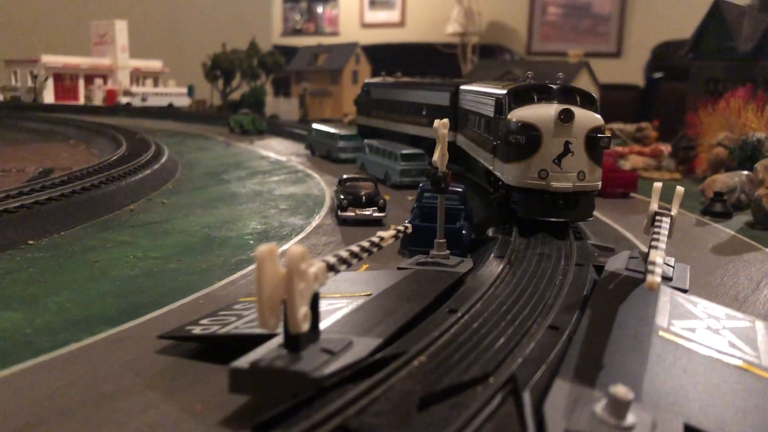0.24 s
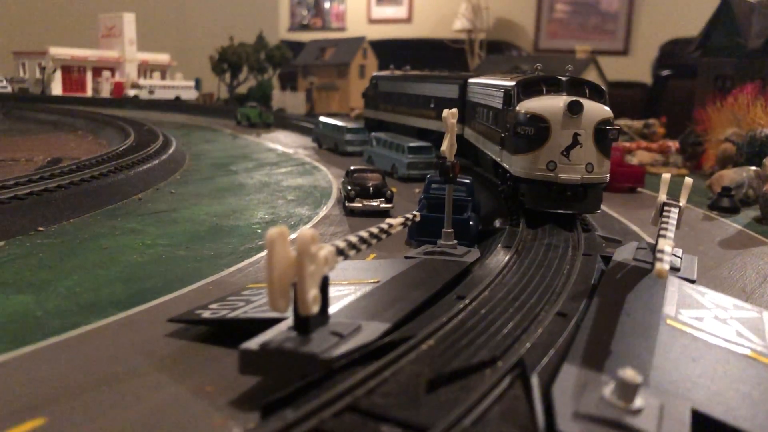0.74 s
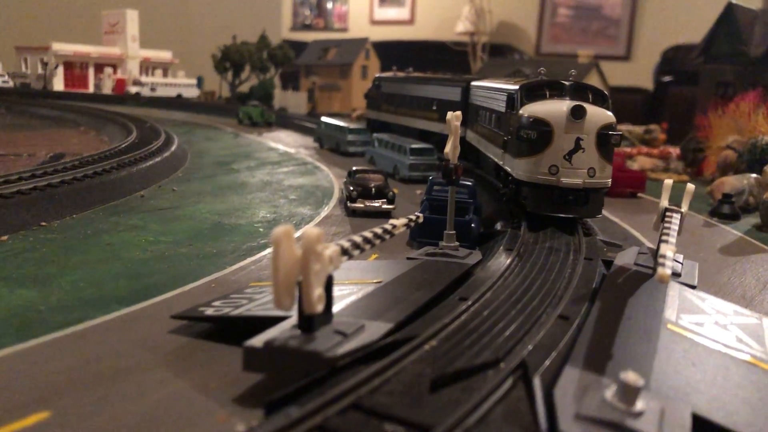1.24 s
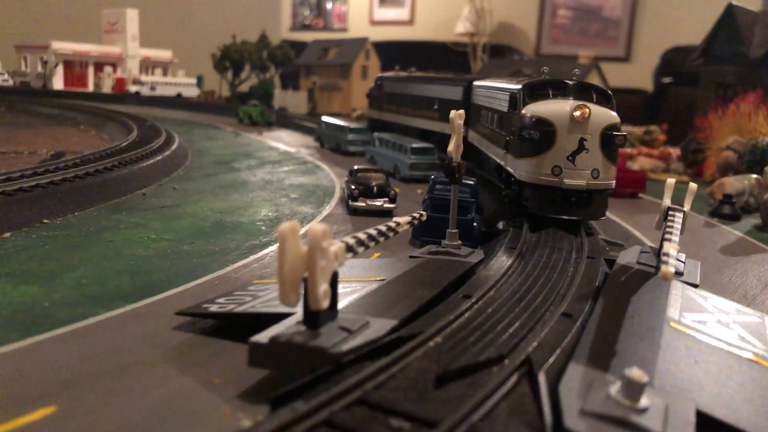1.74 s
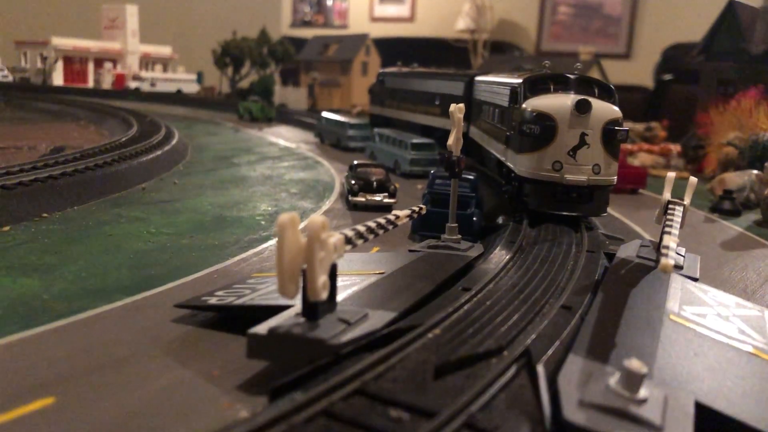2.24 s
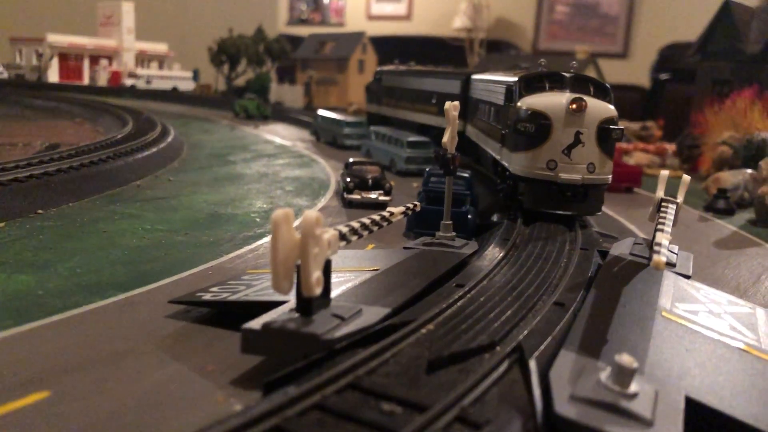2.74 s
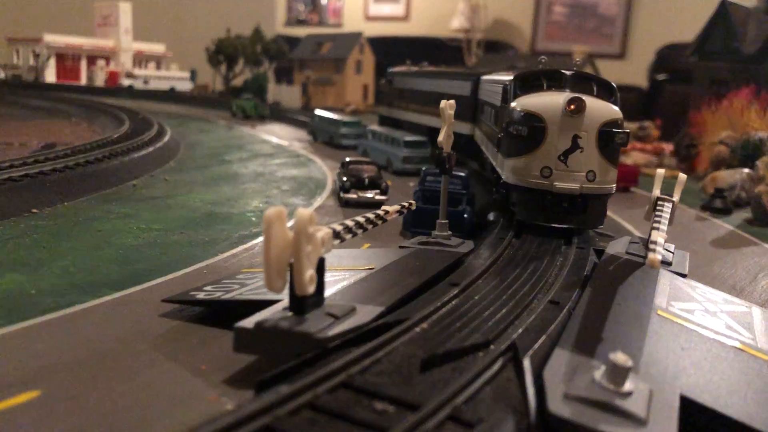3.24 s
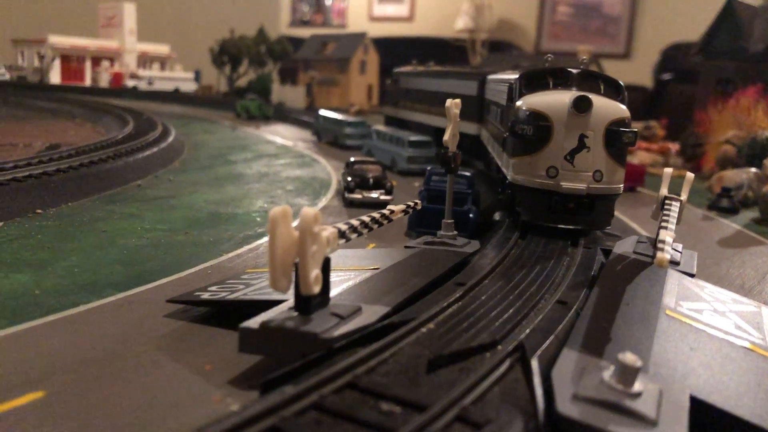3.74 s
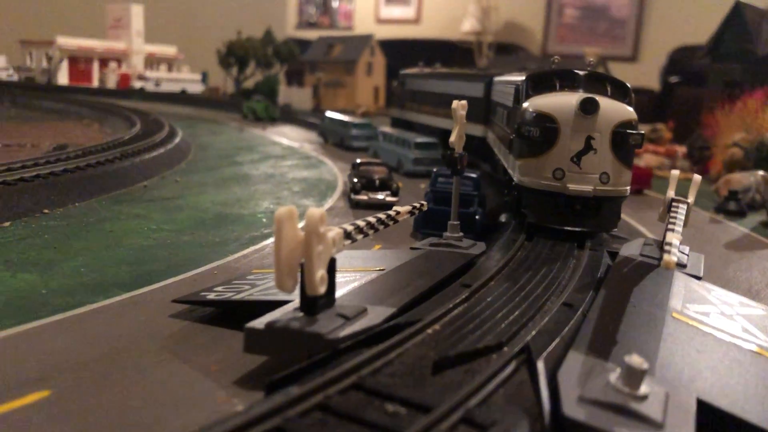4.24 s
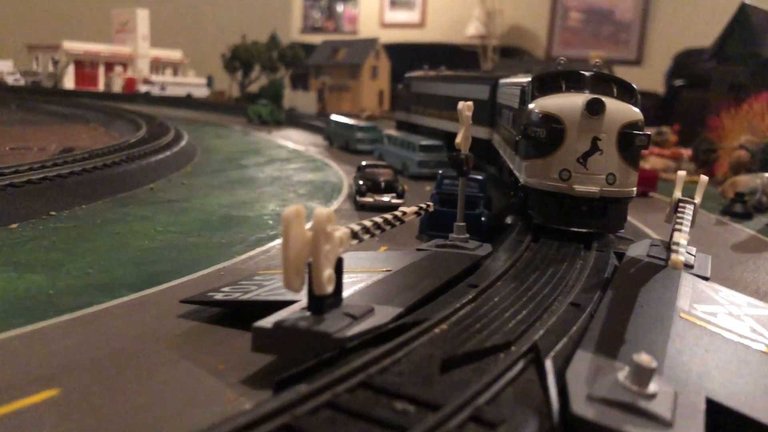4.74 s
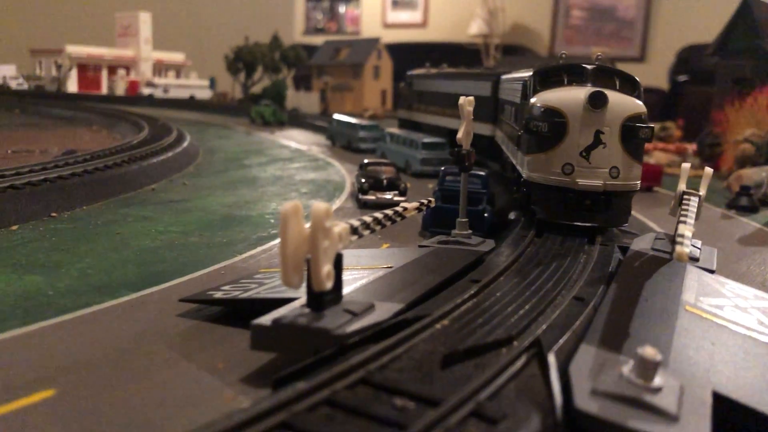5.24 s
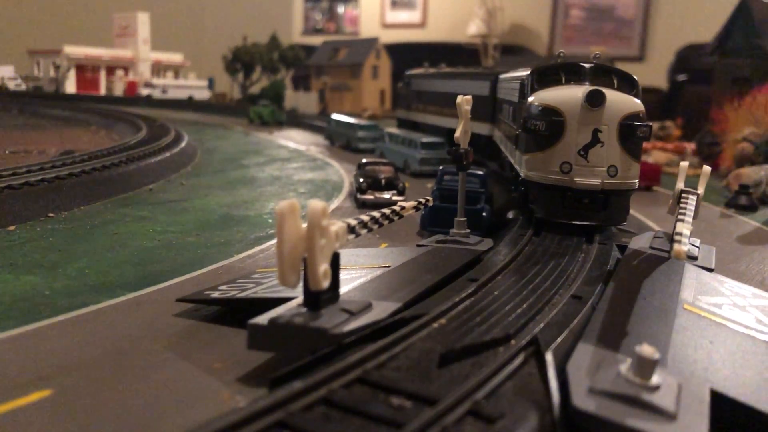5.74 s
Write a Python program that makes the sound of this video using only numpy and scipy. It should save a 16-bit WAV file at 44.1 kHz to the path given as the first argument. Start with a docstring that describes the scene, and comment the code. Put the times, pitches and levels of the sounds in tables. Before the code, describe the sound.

A model locomotive runs in three short spurts, its gears whirring and rattling while the wheels knock on the rails. Close to the microphone, a hand works a plastic speed controller: four sharp switch snaps stand out above soft ticks, rubs and creaks of the knob. The train stops a little past halfway, leaving squeaky knob turns and the last snap in a small, quiet room.

```python
"""A model locomotive inches along a toy layout in three spurts: gear teeth shake and rattle its
chassis, wheels grind on the rails, wheels and couplers knock. Close by, a hand works a plastic
speed controller: the switch snaps, the knob creaks, slides, catches and squeals, and the contacts
ring the housing. A small quiet room with a faint mains hum surrounds both."""
import sys
import numpy as np
from scipy import signal
from scipy.fft import rfft, irfft
from scipy.io import wavfile

SR = 44100
rng = np.random.default_rng(int(sys.argv[2]) if len(sys.argv) > 2 else 0)


def master_out(mix):
    """Clip the mix to full scale and print it as 16-bit PCM to the path in sys.argv[1]."""
    frames = np.transpose(np.atleast_2d(mix))
    ceiling = np.clip(frames, -1, 1)
    pcm = np.round(ceiling * 32767).astype(np.int16)
    wavfile.write(sys.argv[1], SR, pcm)


N = 264600
TIME = np.arange(N) / SR
BLOCK = 8192
BLOCK_HZ = np.maximum(np.arange(BLOCK // 2 + 1) * SR / BLOCK, 1)


def from_db(db):
    """Decibels to gain."""
    return 10 ** (np.asarray(db) / 20)


def unit_rms(x):
    """Scale to rms 1."""
    return x / np.sqrt(np.mean(x ** 2) + 1e-20)


def at_hz(table, hz):
    """Interpolate a table over log frequency."""
    f, value = np.transpose(table)
    return np.interp(np.log(np.maximum(hz, 1)), np.log(f), value)


def add(track, start_s, sound):
    """Mix a sound into a track."""
    i = round(start_s * SR)
    track[i:i + len(sound)] += sound[:N - i]


def coloured(x, spectrum):
    """Filter by a spectrum with steep skirts beyond its ends; rms 1."""
    hz = np.maximum(np.arange(len(x) // 2 + 1) * SR / len(x), 1)
    skirts = 1 / np.sqrt((1 + (spectrum[0][0] / hz) ** 8) * (1 + (hz / spectrum[-1][0]) ** 20))
    return unit_rms(irfft(rfft(x) * from_db(at_hz(spectrum, hz)) * skirts, len(x)))


def noise(spectrum, samples=N):
    """Steady coloured noise; rms 1."""
    return coloured(rng.standard_normal(samples), spectrum)


def drift(rate_hz):
    """Smooth random wander; rms 1."""
    hz = np.arange(N // 2 + 1) * SR / N
    return unit_rms(irfft(rfft(rng.standard_normal(N)) / (1 + (hz / rate_hz) ** 2), N))


def grains(per_s, spread_db):
    """Random tiny contacts of uneven size; rms 1."""
    sizes = from_db(spread_db * np.minimum(rng.exponential(1, N), 4)) * rng.choice([-1, 1], N)
    return unit_rms(sizes * (rng.random(N) < per_s / SR))


def held(start_s, end_s, rise_s, fall_s):
    """Envelope: swells up to the start, holds, decays after the end."""
    return np.exp(np.minimum(TIME - start_s, 0) / rise_s - np.clip((TIME - end_s) / fall_s, 0, 50))


# Motor spurts: start/s, end/s, initial speed/(teeth/s), target speed/(teeth/s), gain/dB
SPURTS = [(0, 0.256, 129.7, 82.4, 1), (1.683, 1.925, 166, 61, -3), (2.669, 3.306, 80, 121.8, -4.5)]
CRUISE_TEETH_PER_S = 120


def motor(rise_s=0.01, fall_s=0.007, settle_s=0.15):
    """Tooth rate and running envelope; each spurt eases toward its target speed."""
    tooth_hz, running = np.full(N, float(CRUISE_TEETH_PER_S)), 0
    for start_s, end_s, initial_hz, target_hz, db in SPURTS:
        offset_hz = (initial_hz - target_hz) * np.exp(-np.maximum(TIME - start_s, 0) / settle_s)
        tooth_hz = np.where(TIME > start_s - 10 * rise_s, target_hz + offset_hz, tooth_hz)
        running = running + from_db(db) * held(start_s, end_s, rise_s, fall_s)
    return tooth_hz, running


# Chassis, gear and wheel spectra: f/Hz, density/dB
RUMBLE = [(90, -12), (115, -3), (140, 1), (220, 1), (280, 1.5), (400, -4.5), (520, -11), (700, -10.5)]
RATTLE = [(260, -30), (450, -11), (768, -7.5), (898, -1.5), (1550, -8), (1700, -4.5), (2380, -7),
          (2610, -11), (3620, -6), (4230, -17), (5500, -27.5), (7150, -37), (12100, -120)]
WHEEL_HISS = [(2470, -41.5), (4200, -5.5), (4540, 0), (5340, -4.5), (5750, -2.5), (7070, -5.5), (8500, -11),
              (15100, -14.5), (16000, -16.5)]


def locomotive(mesh_depth=0.15, growl_db=-7):
    """Gear teeth shake the chassis and rattle in rhythm, wheels grind the rails; all grow with speed."""
    tooth_hz, running = motor()
    teeth = np.cumsum(tooth_hz * np.exp(0.13 * drift(40))) / SR
    blows = np.diff(np.floor(teeth), prepend=0) * from_db(2.3 * drift(110))
    mesh = np.exp(mesh_depth * np.cos(2 * np.pi * teeth))
    chassis = noise(RUMBLE) + from_db(growl_db) * coloured(blows, RUMBLE)
    shudder = from_db(2 * drift(32))
    gears = coloured(grains(per_s=2600, spread_db=2.7) * mesh * shudder, RATTLE)
    wheels = coloured(grains(per_s=1800, spread_db=5.9) * mesh * shudder, WHEEL_HISS)
    speed_octaves = np.log2(tooth_hz / CRUISE_TEETH_PER_S)
    return running * (from_db(-51 + 16.5 * speed_octaves) * chassis
                      + from_db(-46.5 + 15.5 * speed_octaves) * gears
                      + from_db(-54 + 16 * speed_octaves) * wheels)


# Room hush spectrum: f/Hz, density/dB
HUSH_SPECTRUM = [(45, -4), (60, -3), (90, -6.5), (140, -3.5), (250, -3.5), (500, -9.5), (1000, -12),
                 (1800, -19.5), (2600, -22), (4000, -24.5), (8000, -28), (16000, -30.5)]


def room_tone(hush_db=-68.5, hum_db=-81, hum_hz=60):
    """Steady hush and mains hum."""
    hum = np.sqrt(2) * np.sin(2 * np.pi * hum_hz * TIME)
    return from_db(hush_db) * noise(HUSH_SPECTRUM) + from_db(hum_db) * hum


def pressure(moves, rise_s, fall_s, waver_db=2):
    """Envelope of hand moves under wavering finger pressure."""
    envelope = sum(from_db(db) * held(start_s, end_s, rise_s, fall_s) for start_s, end_s, db in moves)
    return envelope * from_db(waver_db * np.tanh(drift(18.36)))


# Hand bumps: start/s, end/s, level/dB
BUMPS = [(.02, .1, -61), (.97, 1.11, -56), (1.75, 1.84, -60), (2.02, 2.16, -67.5), (3.89, 4.07, -61),
         (4.29, 4.5, -67.5), (4.57, 4.67, -62.5), (4.8, 4.9, -59), (4.95, 5.07, -64)]
# Bump spectrum: f/Hz, density/dB
BUMP_SPECTRUM = [(35, -6), (52, 0.5), (70, -2), (95, -12.5), (135, -4.5), (220, -16), (400, -17.5)]


def hand_bumps(gain_db=-1):
    """The hand bumps dully on the housing."""
    return from_db(gain_db) * pressure(BUMPS, rise_s=0.012, fall_s=0.016) * noise(BUMP_SPECTRUM)


# Wheel and coupler knocks: t/s, tick/dB, thump/dB
KNOCKS = [(.161, -32, -31.5), (0.176, -37.5, -60), (0.348, -62, -49), (.715, -83, -53),
          (1.67, -38.5, -50.5), (1.685, -37, -31.5), (1.748, -36, -39), (1.771, -37.5, -46),
          (2.82, -38.5, -35), (2.829, -40.5, -49), (3.061, -39.5, -65), (3.307, -44, -52)]


def track_knocks(tick_s=0.0056, thump_s=0.0097, hiss_db=-4):
    """A wheel or coupler ticks and the baseboard thumps under it."""
    out, t = np.zeros(N), TIME[:BLOCK]
    for start_s, tick_db, thump_db in KNOCKS:
        tick = (noise(RATTLE, BLOCK) + from_db(hiss_db) * noise(WHEEL_HISS, BLOCK)) * np.exp(-t / tick_s)
        thump = noise(RUMBLE, BLOCK) * (1 - np.exp(-t / tick_s)) * np.exp(-t / thump_s)
        add(out, start_s, from_db(tick_db) * tick + from_db(thump_db) * thump)
    return out


# Controller housing modes: f/Hz, width/Hz, level/dB
HOUSING_MODES = [(150.7, 33, -12.5), (362.9, 210, -4.5), (486, 110, -1.5), (645, 37, 3), (936, 97, 1.5),
                 (1064, 78, 6), (1370, 77, 6), (1828, 69, 7.5), (2410, 150, -6.5), (2770, 75, -4),
                 (3174, 170, 3), (3566, 81, 1.5), (3924, 260, 0.5), (4760, 770, -7), (5400, 610, -7),
                 (6840, 1300, -13), (7700, 660, -9), (9120, 350, -9.5), (9630, 480, -9), (11260, 750, -13),
                 (12705, 300, -9.5), (14900, 900, -12.5)]


def housing(lag_s=0.0018, scatter_db=0, mode_factor=-1):
    """Response of the plastic shell; bending waves carry treble ahead of bass (lag_s at 1 kHz)."""
    offsets_db = scatter_db * rng.standard_normal(len(HOUSING_MODES))
    modes = 0
    for k, (hz, width_hz, db) in enumerate(HOUSING_MODES):
        detuning = (BLOCK_HZ ** 2 - hz ** 2) / (BLOCK_HZ * width_hz)
        modes = modes + mode_factor ** k * from_db(db + offsets_db[k]) / (1 + 1j * detuning)
    return modes * np.exp(-4j * np.pi * lag_s * np.sqrt(1000 * BLOCK_HZ))


def strike(response, treble_db, bass_db, treble_hz=5000, bass_hz=700):
    """One contact on the shell, shelved in treble and bass; energy of 5 ms at rms 1."""
    treble = 1 / (1 + (treble_hz / BLOCK_HZ) ** 8)
    bass = 1 / (1 + (BLOCK_HZ / bass_hz) ** 4)
    hit = irfft(response * from_db(treble_db * treble + bass_db * bass))[:BLOCK // 2]
    return hit / np.sqrt(np.sum(hit ** 2) / (0.005 * SR))


def skidded(hit, skid_db, skid_s, highpass_hz=2500):
    """Trail a contact with a bright skid of tiny ones, at equal total energy."""
    skid = rng.standard_normal(BLOCK) * np.exp(-TIME[:BLOCK] / skid_s)
    skid = signal.sosfilt(signal.butter(2, highpass_hz, "high", fs=SR, output="sos"), skid)
    both = hit + from_db(skid_db) * signal.fftconvolve(hit, skid / np.linalg.norm(skid))[:len(hit)]
    return both * np.linalg.norm(hit) / np.linalg.norm(both)


# Switch snaps: t/s, level/dB, treble/dB, bass/dB, bounce delay/s, bounce gain/dB, spring gain/dB
SNAPS = [(0.2538, -20.5, 5, 0.5, 0.00056, -20, -21.5), (0.8223, -17, 5.5, 2.5, 0.0018, -2, -35.5),
         (1.9251, -20, 6.5, 0, 0.00036, -26.5, -23), (4.5410, -17, 4.5, -8, 0.00087, -6.5, -39)]
# Spring modes: f/Hz, t60/s, level/dB
SPRING_MODES = [(1655, 1.5, -49), (3930, .2, -31), (4080, .32, -33), (7590, .15, -40)]
# Loose-part spectrum: f/Hz, density/dB
CHATTER = [(150, -6.5), (400, -0.5), (1000, 0.5), (4000, 0), (7000, -5), (12000, -12.5), (16000, -7.5)]


def switch(chatter_db=-8, chatter_s=0.006, settle_db=-21, settle_s=0.004):
    """Each snap lands twice; loose parts chatter and settle, the spring rings on."""
    out, t = np.zeros(N), TIME[:SR]
    shell = housing(scatter_db=2.74)
    spring = sum(from_db(db - 60 * t / t60) * np.sin(2 * np.pi * hz * t) for hz, t60, db in SPRING_MODES)
    decay = from_db(chatter_db) * np.exp(-t / chatter_s) + from_db(settle_db) * np.exp(-t / settle_s)
    for start_s, db, treble_db, bass_db, bounce_s, bounce_db, spring_db in SNAPS:
        hit = from_db(db) * skidded(strike(shell, treble_db, bass_db), skid_db=0.5, skid_s=0.0022)
        add(out, start_s, hit)
        add(out, start_s + bounce_s, from_db(bounce_db) * hit)
        add(out, start_s + bounce_s, from_db(db) * decay * noise(CHATTER, SR))
        add(out, start_s, from_db(spring_db) * spring)
    return out


def snap_spill(send_db=-14, burst_s=0.0042):
    """Snaps radiate in all directions, so the room gets a smooth burst without the shell's peaks."""
    out = np.zeros(N)
    for start_s, db, _, _, bounce_s, bounce_db, _ in SNAPS:
        burst = noise(CHATTER, BLOCK) * np.exp(-TIME[:BLOCK] / burst_s)
        add(out, start_s + bounce_s, from_db(db + send_db) * np.hypot(1, from_db(bounce_db)) * burst)
    return out


def stick_slip(contact, slip_hz, level_db, spread_db=14, jitter=0.0247, slow_jitter=0.19, lock_hz=567):
    """A run of slips: slow ones come unevenly, fast ones are smaller and lock into a squeak."""
    gap_draws, size_draws = rng.standard_normal((2, BLOCK // 16))
    uneven = jitter + slow_jitter / (1 + (slip_hz / lock_hz) ** 4)
    onsets, sample = [], 0.
    while sample < len(slip_hz):
        onsets.append(sample)
        sample += SR / slip_hz[int(sample)] * np.exp(uneven[int(sample)] * gap_draws[len(onsets)])
    k = np.array(onsets).astype(int)
    sizes = from_db(level_db[k] + spread_db * uneven[k] * size_draws[:len(k)]) / np.sqrt(slip_hz[k])
    delays = np.exp(-2j * np.pi * np.outer(np.array(onsets) / SR, BLOCK_HZ))
    sound = irfft(contact * (sizes @ delays))
    return sound * np.linalg.norm(from_db(level_db)) / np.linalg.norm(sound)


# Short creaks: t/s, length/s, slip rate/Hz, level/dB, treble/dB
CREAKS = [(0.494, 0.017, 496, -58.5, -9.5), (1.005, 0.011, 511, -41.5, -8), (1.052, 0.0097, 400, -49, -7),
          (1.192, 0.018, 549, -50.5, -2.5), (1.304, 0.022, 397, -52.5, -1), (1.386, 0.022, 494, -51, 3),
          (1.419, .01, 435, -55, -1), (2.1, 0.0073, 946, -50, -8), (2.312, 0.0161, 443, -55, -11),
          (2.453, .018, 1011, -54.5, -14), (3.788, .03, 333, -60, -5), (5.645, 0.03, 238, -55, -0.5),
          (5.694, 0.044, 195.3, -56.5, 1), (5.888, 0.035, 272, -57.5, 0), (5.93, 0.039, 275, -50, 4.5),
          (5.976, 0.025, 630, -64.5, -3)]
# Longer turns, one curve each: t/s, slip rate/Hz, level/dB
TURNS = [
    [(1.247, 507, -51), (1.26, 1088, -47.5), (1.276, 850, -50)],
    [(3.326, 1842, -45), (3.345, 1033, -49), (3.378, 197.6, -58), (3.422, 206, -51.5), (3.435, 780, -56.5),
     (3.467, 656, -52)],
    [(3.47, 963, -56), (3.486, 1590, -51.5), (3.499, 1635, -47.5), (3.508, 724, -56.5), (3.552, 653, -55.5),
     (3.574, 1930, -58)],
    [(4.9, 1810, -63), (4.915, 1053, -56.5), (4.935, 500, -59)],
    [(5.249, 1306, -51.5), (5.265, 468.4, -50), (5.285, 270, -54.5), (5.32, 391, -53), (5.358, 331, -54.5)],
    [(5.505, 504, -54), (5.549, 902, -50.5), (5.588, 1180, -48.5), (5.603, 1626, -48.5), (5.625, 1900, -68)],
    [(5.838, 466, -47.5), (5.857, 1386, -55.5), (5.878, 1410, -56.5)],
]


def knob_creaks(shell, bare_db=-13, low_hz=400, high_hz=3800, treble_hz=2400, swell_db=4, sag_oct=0.133):
    """Plastic sticks and slips, heard bare and through the shell; creaks swell and sag, turns glide."""
    out = np.zeros(N)
    band = 1 / np.sqrt((1 + (BLOCK_HZ / high_hz) ** 18) * (1 + (low_hz / BLOCK_HZ) ** 4))
    contact = band * (shell + from_db(bare_db))
    for start_s, length_s, hz, db, treble_db in CREAKS:
        progress = np.linspace(0, 1, int(length_s * SR))
        slip_hz = hz * 2 ** (sag_oct * (0.5 - progress))
        pressure_db = swell_db * (np.sin(np.pi * progress) - 2 / np.pi)
        shelf = from_db(treble_db / (1 + (treble_hz / BLOCK_HZ) ** 8))
        add(out, start_s, stick_slip(contact * shelf, slip_hz, db + pressure_db))
    for turn in TURNS:
        times_s, hz, db = np.transpose(turn)
        t = times_s[0] + TIME[:int((times_s[-1] - times_s[0]) * SR)]
        slip_hz = np.exp(np.interp(t, times_s, np.log(hz)))
        add(out, times_s[0], stick_slip(contact, slip_hz, np.interp(t, times_s, db)))
    return out


# Free knob slides: start/s, end/s, level/dB
SLIDES = [(.63, .7, -68), (.96, 1.05, -63), (1.13, 1.3, -72), (1.39, 1.44, -70), (2.23, 2.32, -70),
          (2.52, 2.68, -69.5), (3.89, 4.01, -67.5), (4.42, 4.45, -73.5), (4.63, 4.71, -67),
          (5.13, 5.23, -72)]
# Slide spectrum: f/Hz, density/dB
SLIDE_SPECTRUM = [(1760, -3), (3000, -4.5), (3650, -3.5), (4500, -9.5), (5250, -12.5), (6440, -11),
                  (7000, -7.5), (8400, -13.5), (12200, -12), (13600, -16.5), (14800, -6.5), (16000, -11)]


def knob_slides(gain_db=-1):
    """The knob slides freely with a thin hiss."""
    return from_db(gain_db) * pressure(SLIDES, rise_s=0.012, fall_s=0.015) * noise(SLIDE_SPECTRUM)


# Finger rubs: start/s, end/s, level/dB
RUBS = [(.67, .715, -61), (.95, 1.11, -59), (1.2, 1.33, -65), (2.55, 2.66, -64.5), (3.89, 4.02, -61),
        (4.28, 4.31, -69.5), (4.42, 4.5, -64), (4.69, 4.72, -59), (4.96, 5.01, -61)]
# Rub spectrum: f/Hz, density/dB
RUB_SPECTRUM = [(150, -25), (250, -4.5), (533, -5), (634, 2.5), (764, -5), (1070, -4), (1570, -12),
                (1840, -8.5), (2180, -18), (2370, -12.5), (4080, -28), (6000, -23), (7800, -56),
                (13200, -120)]


def finger_rubs():
    """Fingers shift on the housing with grainy friction."""
    envelope = pressure(RUBS, rise_s=0.012, fall_s=0.02)
    return envelope * coloured(grains(per_s=3000, spread_db=2.8), RUB_SPECTRUM)


# Knob catches: t/s, level/dB, treble/dB
CATCHES = [(0.7943, -59, -4.5), (.812, -37.5, -14.5), (0.9451, -45.5, -7.5), (0.991, -53, -1),
           (1.3899, -41, -16.5), (1.5391, -40, -17.5), (1.633, -42.5, -18.5), (2.2928, -44.5, -22),
           (2.449, -56.5, -5), (3.5853, -34, -8), (3.758, -63, -2), (4.447, -53, -11.5), (4.528, -44, -5.5),
           (4.781, -51, -21), (4.861, -49, -21), (5.1123, -42.5, -20), (5.49, -60, -14),
           (5.501, -41.5, -20), (5.695, -48, -21), (5.8341, -41, -19)]


def knob_catches(low_hz=450, high_hz=14000):
    """The knob breaks free with a soft tick and a short skid, each time at another spot."""
    out = np.zeros(N)
    band = 1 / ((1 + (BLOCK_HZ / high_hz) ** 4) * np.sqrt(1 + (low_hz / BLOCK_HZ) ** 4))
    for start_s, db, treble_db in CATCHES:
        contact = band * housing(lag_s=0.0014, scatter_db=2, mode_factor=0.99)
        tick = strike(contact, treble_db, bass_db=-6, treble_hz=4360)
        add(out, start_s, from_db(db) * skidded(tick, skid_db=4.5, skid_s=0.0038, highpass_hz=900))
    return out


# Knob squeals: start/s, end/s, level/dB
SQUEALS = [(1.14, 1.19, -75), (2.52, 2.545, -66.5), (2.565, 2.585, -68), (2.64, 2.66, -65),
           (5.14, 5.23, -74.5)]


def knob_squeals(centre_hz=3640, waver=0.025, flutter_db=5):
    """A thin, unsteady tone where the sliding knob drags."""
    hz = centre_hz * np.exp(waver * drift(27.5))
    tone = np.sqrt(2) * np.sin(2 * np.pi * np.cumsum(hz) / SR)
    return pressure(SQUEALS, rise_s=0.0052, fall_s=0.0047) * from_db(flutter_db * drift(159)) * tone


# Room decay: f/Hz, t60/s
ROOM_T60 = [(100, 0.34), (500, 0.17), (2000, 0.25), (4000, 0.21), (8000, 0.21), (16000, 0.09)]
# Room colour: f/Hz, level/dB
ROOM_COLOUR = [(100, 7.5), (250, 7.5), (600, -1), (2000, -7.5), (6000, -9.5), (16000, -3)]


def room_reverb(x, build_s=0.0038):
    """Dense reflections build up, then decay by octave band; the bass lasts longest."""
    t, hz = TIME[:SR], np.maximum(np.arange(SR // 2 + 1), 1)
    white, tail = rfft(rng.standard_normal(SR)), 0
    for centre_hz in 62.5 * 2. ** np.arange(9):
        band = irfft(white * np.maximum(1 - abs(np.log2(hz / centre_hz)), 0), SR)
        tail = tail + band * from_db(at_hz(ROOM_COLOUR, centre_hz) - 60 * t / at_hz(ROOM_T60, centre_hz))
    tail = tail * (1 - np.exp(-(t / build_s) ** 2))
    return signal.fftconvolve(x, tail / np.linalg.norm(tail))[:N]


def scene(train_send_db=-11, controller_send_db=-20):
    """The controller is near and almost dry, the train a little farther off."""
    rubbed_shell = housing(mode_factor=1)
    controller = switch() + knob_catches() + knob_creaks(rubbed_shell) + knob_squeals()
    train = locomotive() + track_knocks()
    send = from_db(train_send_db) * train + from_db(controller_send_db) * controller + snap_spill()
    room = room_reverb(send) + room_tone()
    handling = hand_bumps() + finger_rubs() + knob_slides()
    return (train + controller + handling + room)[None]


def record(dry, highpass_hz=42, lowpass_hz=16200):
    """The microphone drops the deepest bass; the top is cut steeply."""
    thin = signal.sosfilt(signal.butter(4, highpass_hz, "high", fs=SR, output="sos"), dry)
    return signal.sosfilt(signal.ellip(10, 0.2, 80, lowpass_hz, fs=SR, output="sos"), thin)


dry = scene()
out = record(dry)
master_out(out)
```